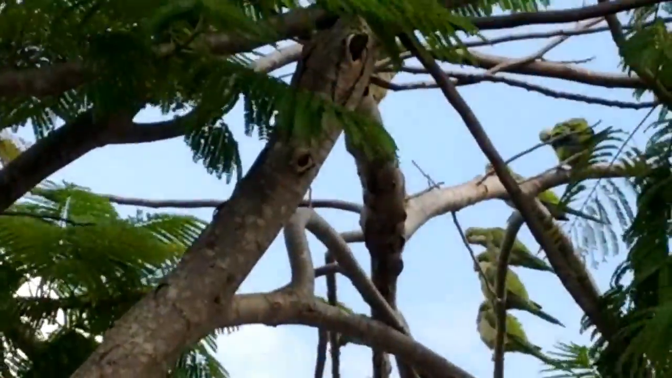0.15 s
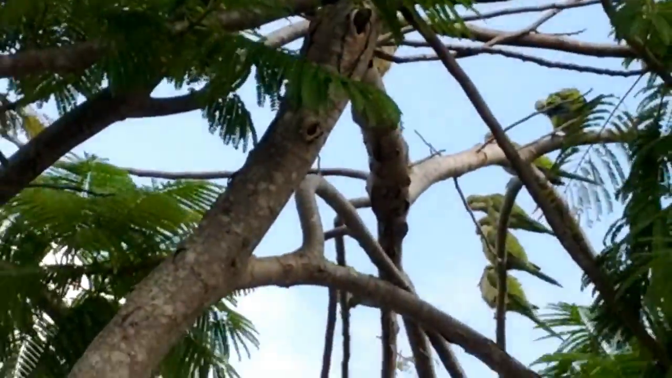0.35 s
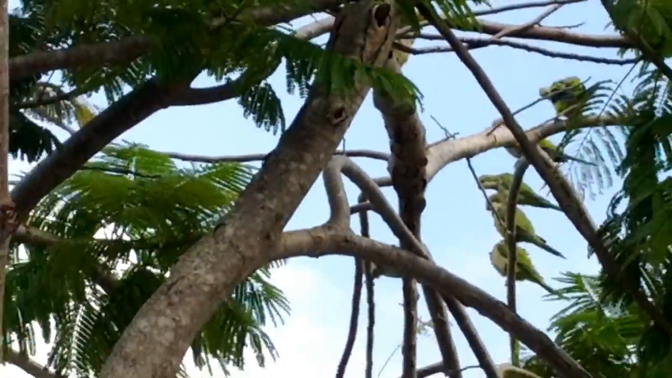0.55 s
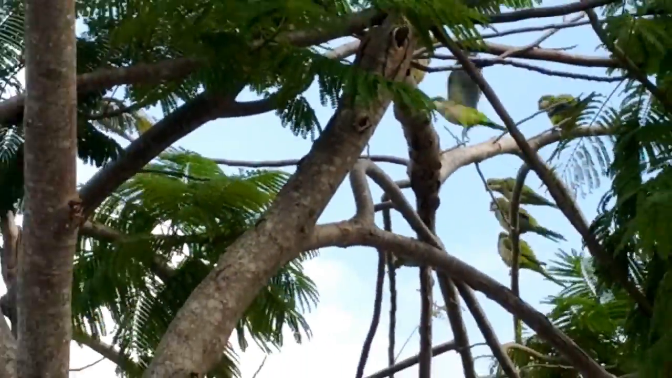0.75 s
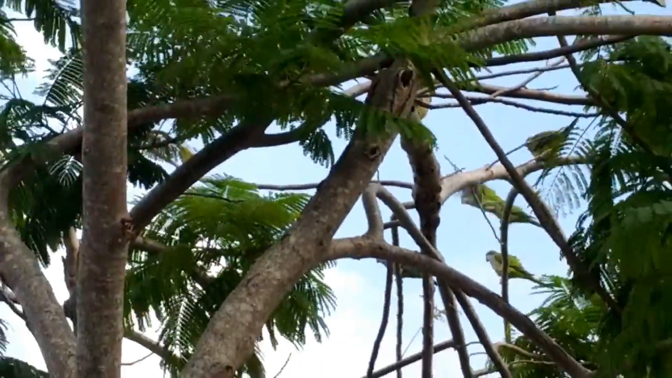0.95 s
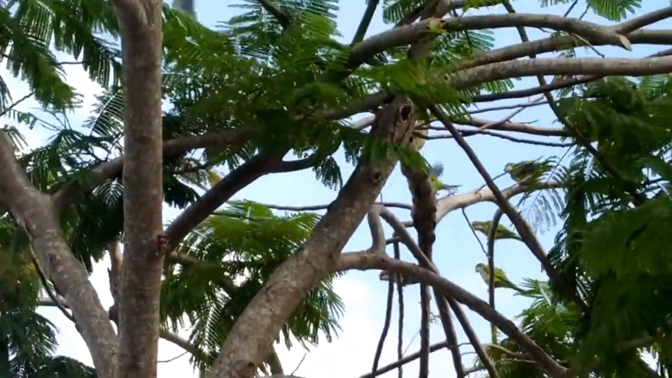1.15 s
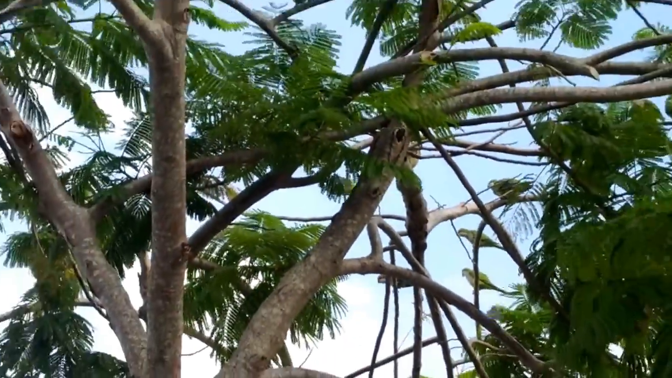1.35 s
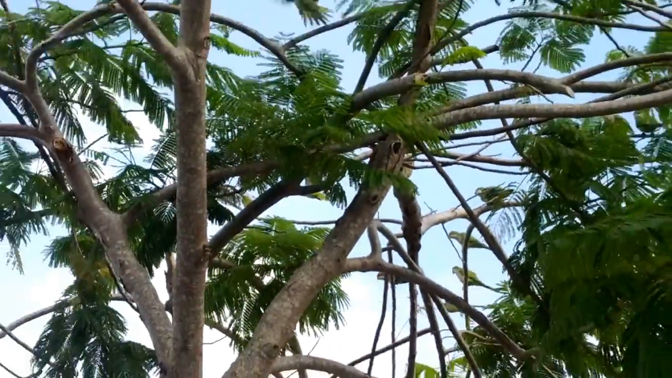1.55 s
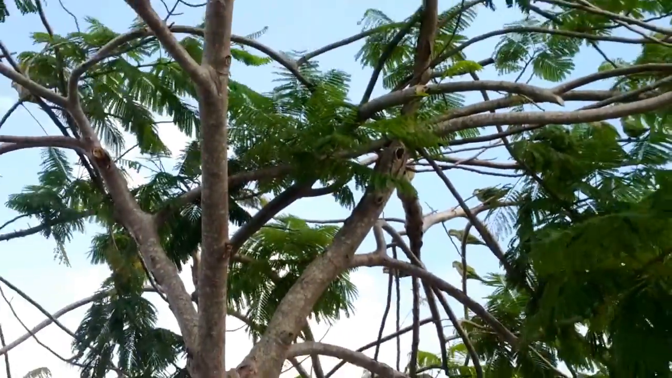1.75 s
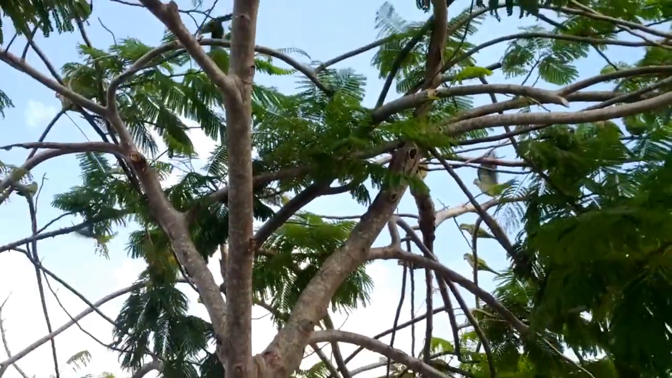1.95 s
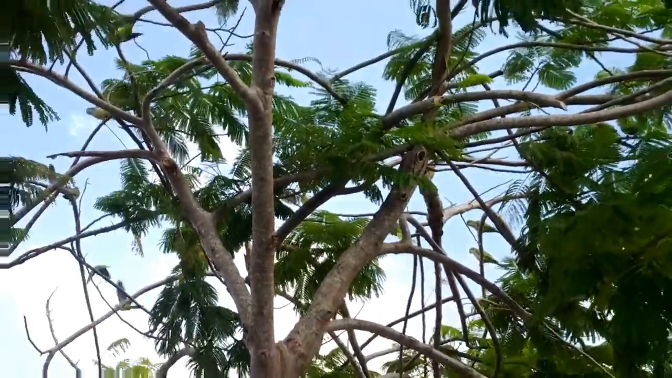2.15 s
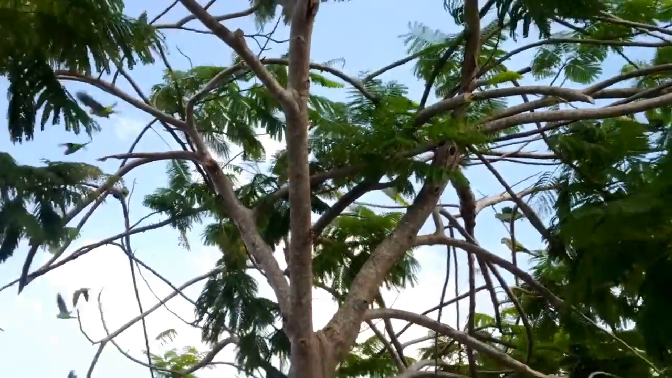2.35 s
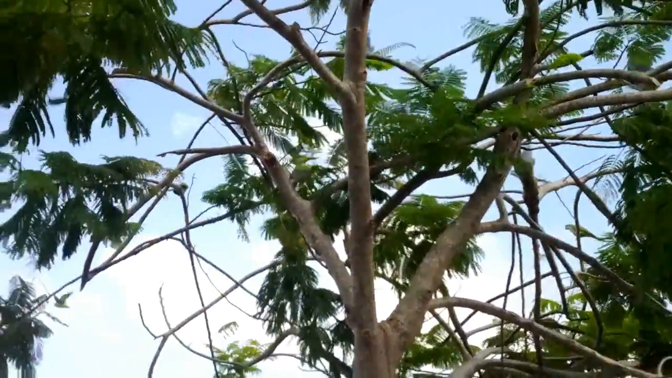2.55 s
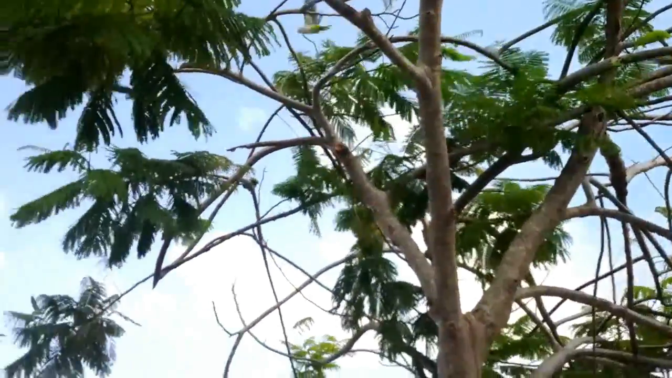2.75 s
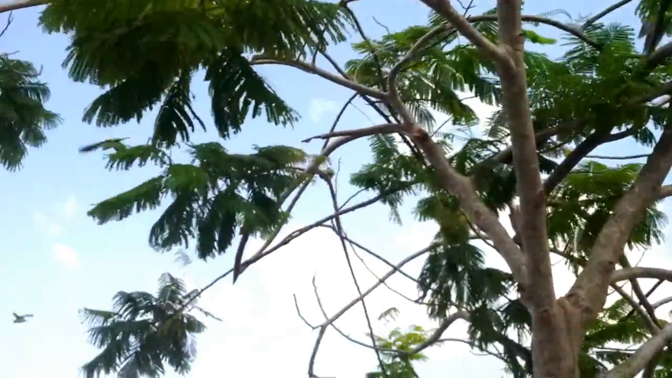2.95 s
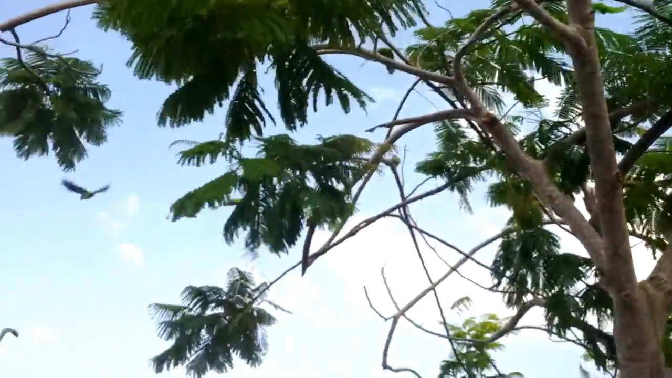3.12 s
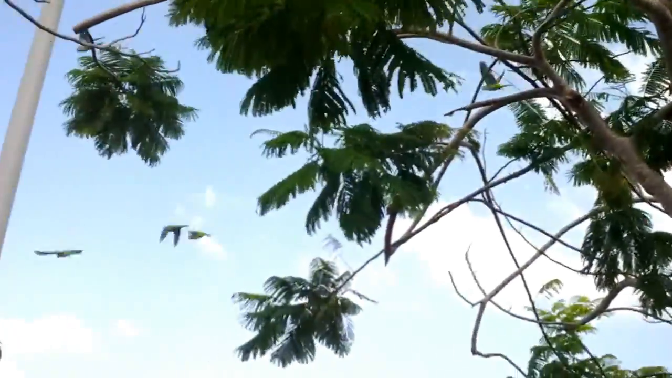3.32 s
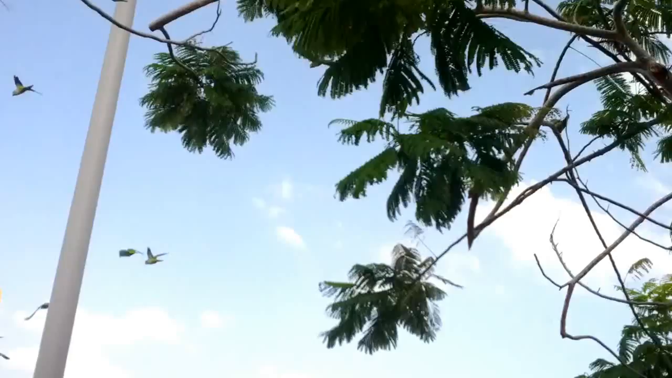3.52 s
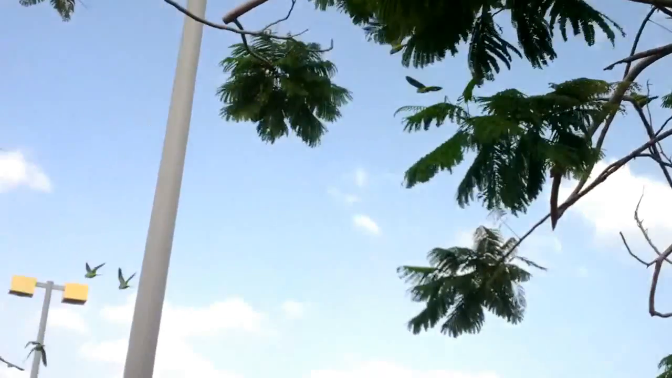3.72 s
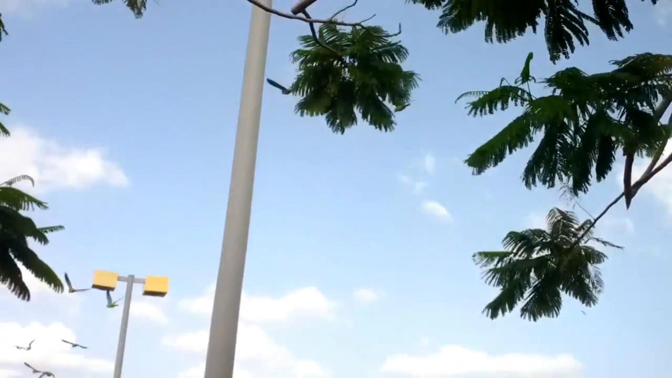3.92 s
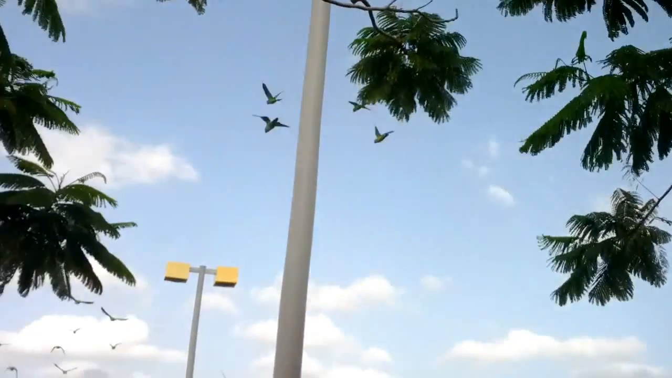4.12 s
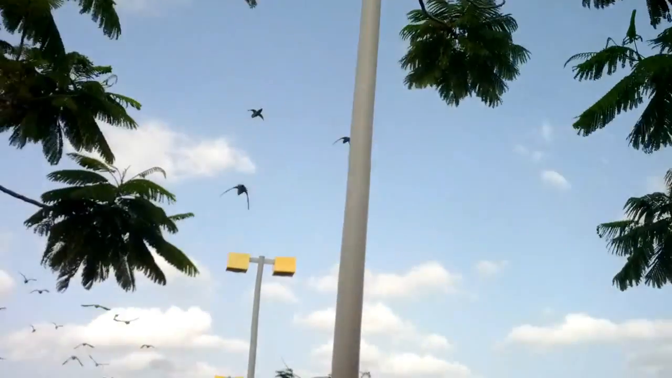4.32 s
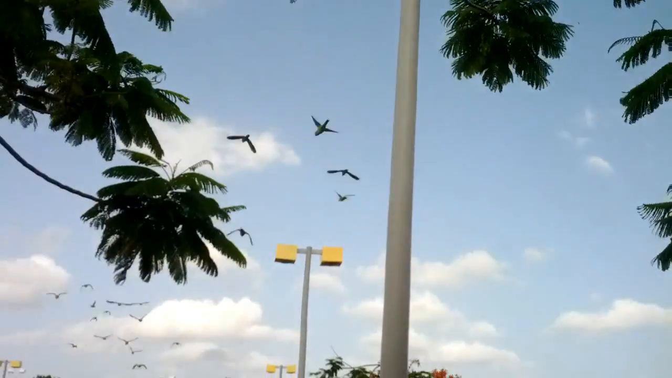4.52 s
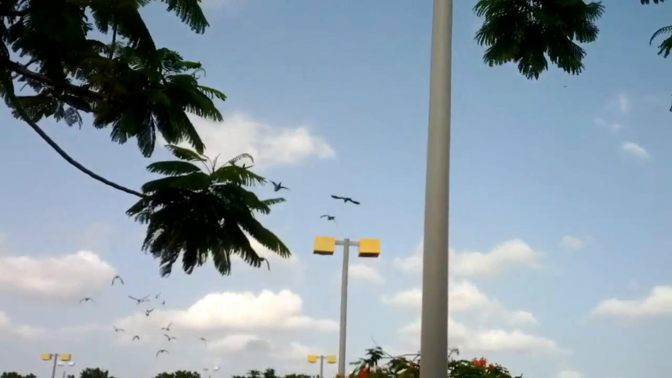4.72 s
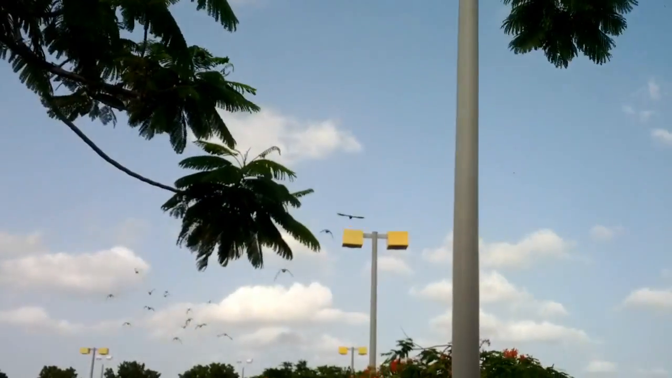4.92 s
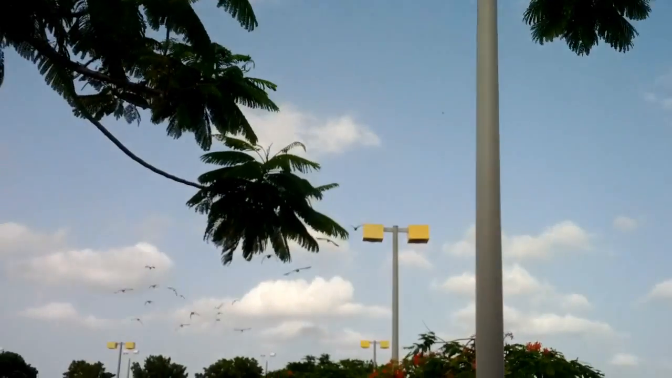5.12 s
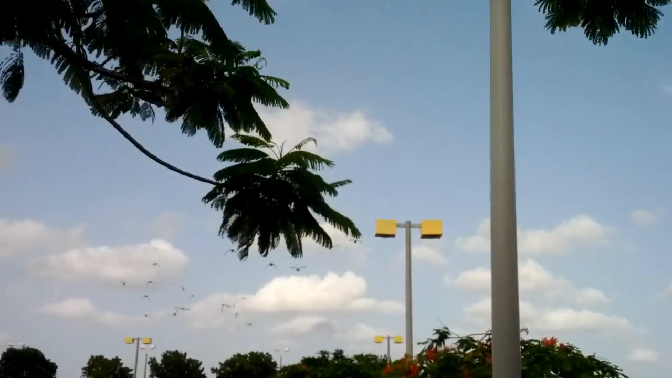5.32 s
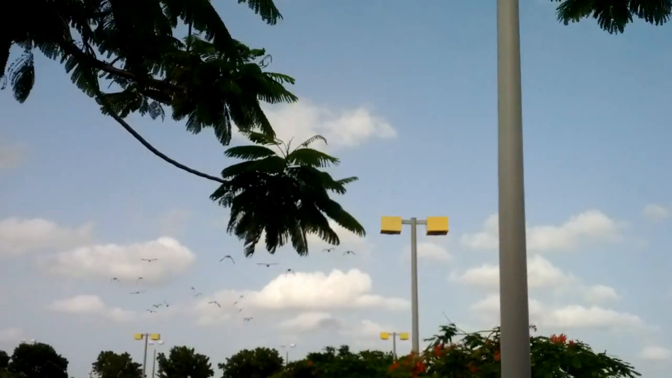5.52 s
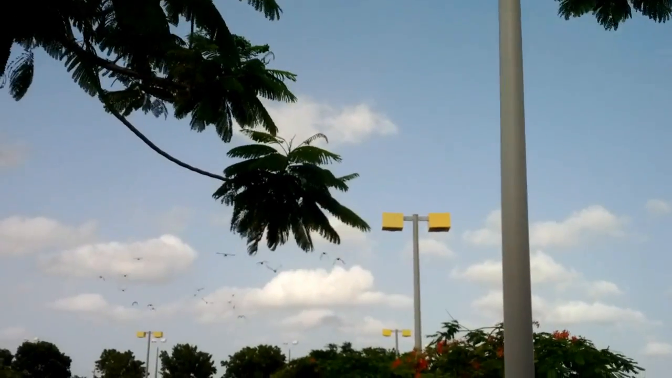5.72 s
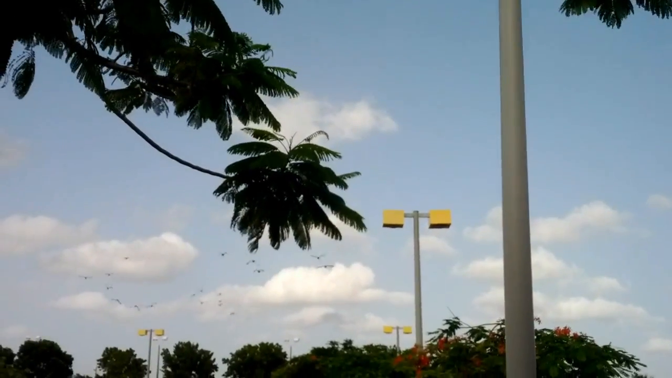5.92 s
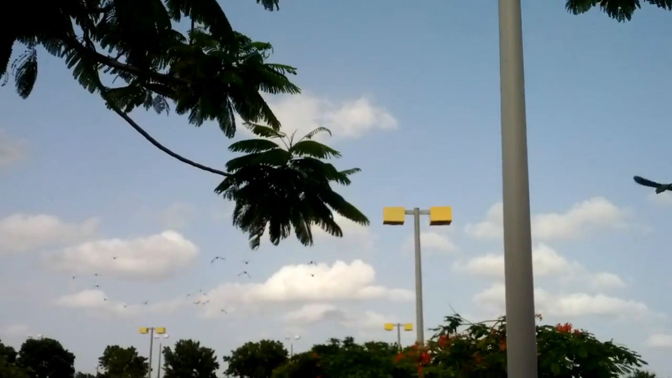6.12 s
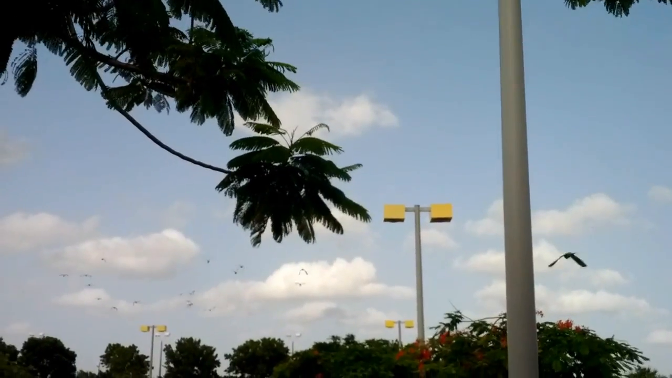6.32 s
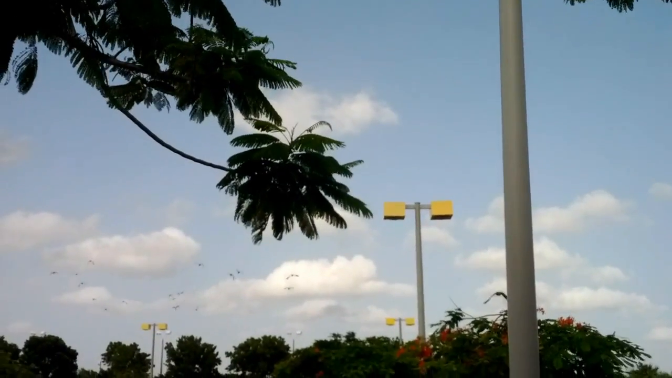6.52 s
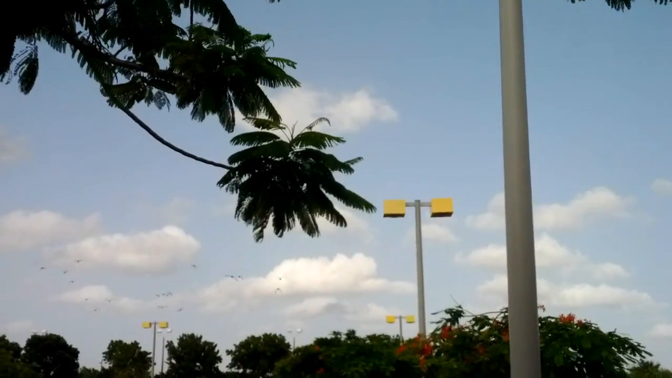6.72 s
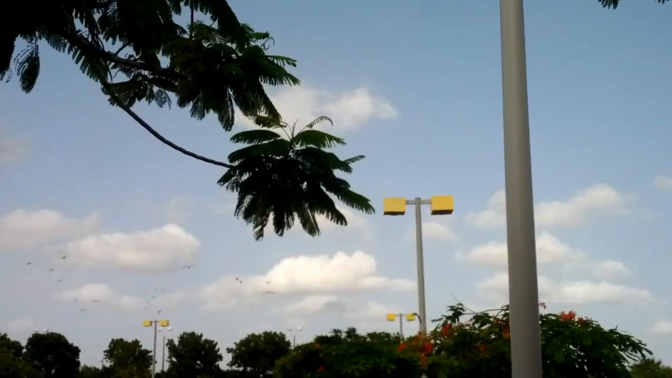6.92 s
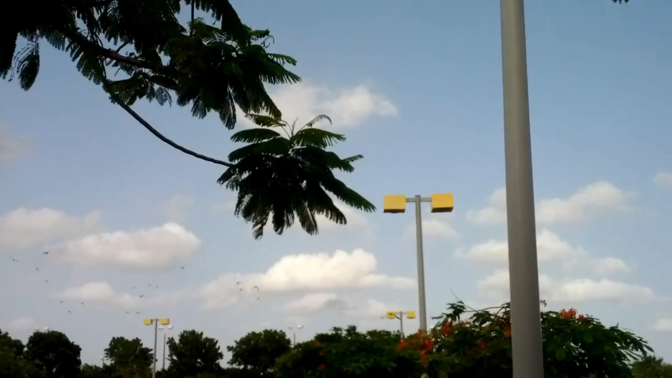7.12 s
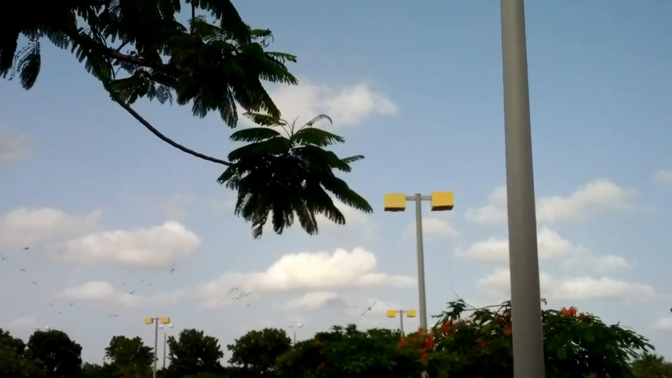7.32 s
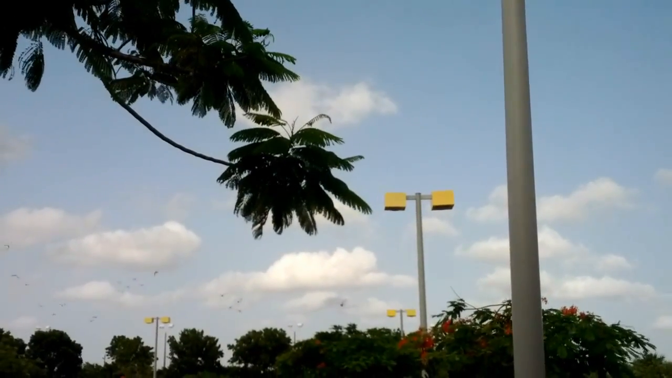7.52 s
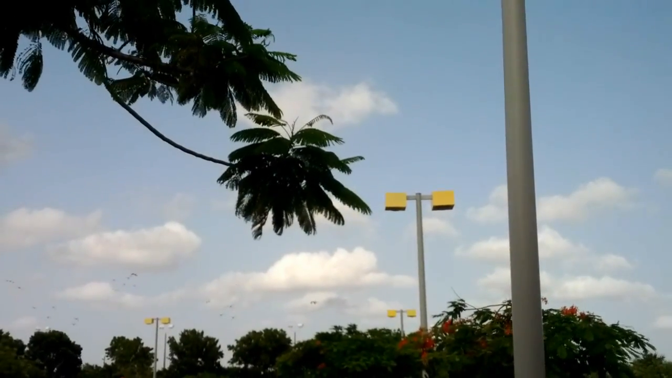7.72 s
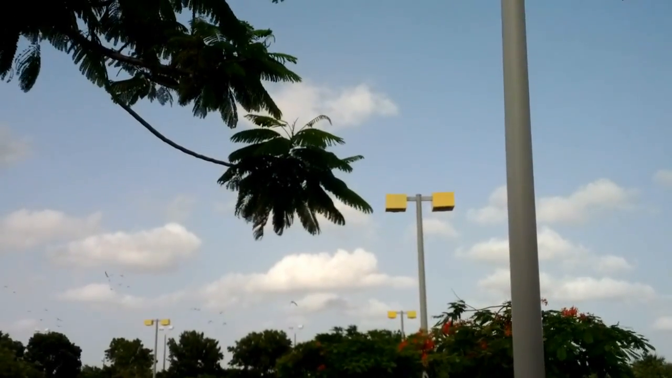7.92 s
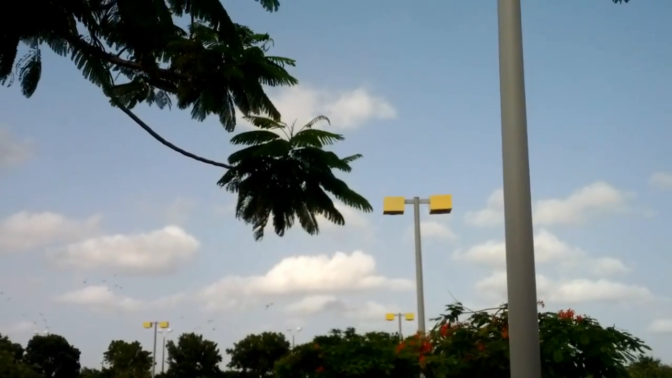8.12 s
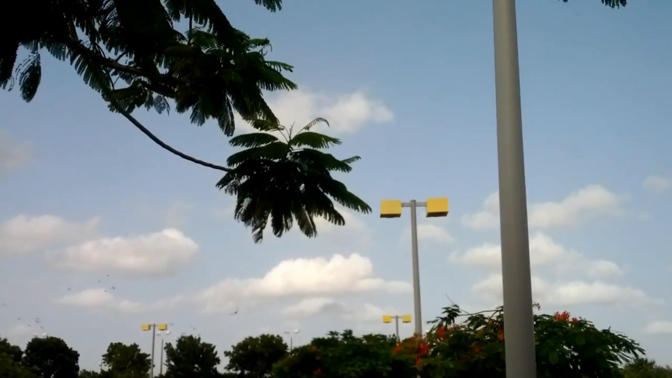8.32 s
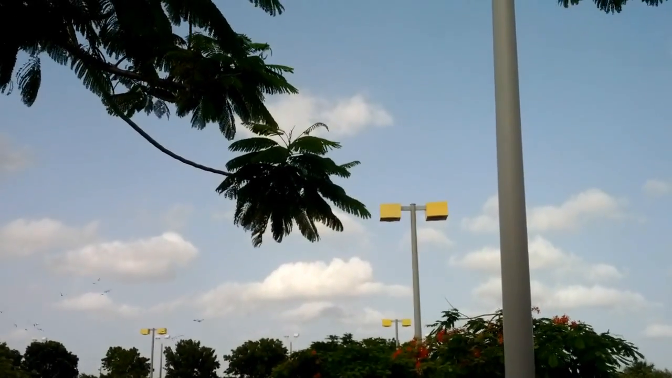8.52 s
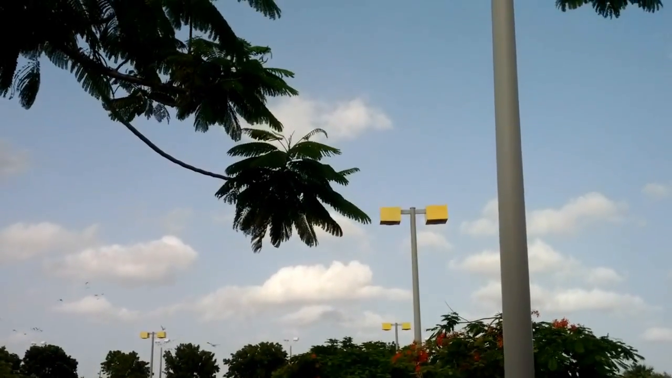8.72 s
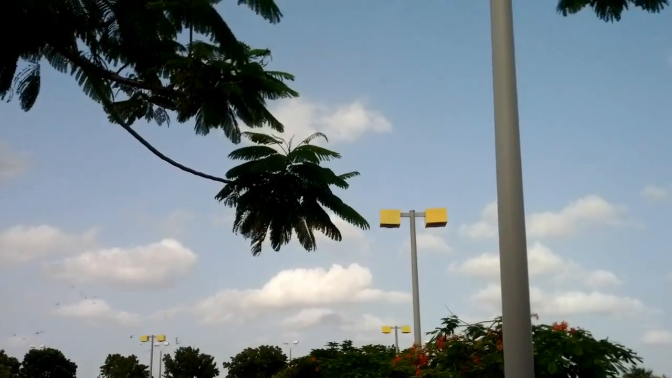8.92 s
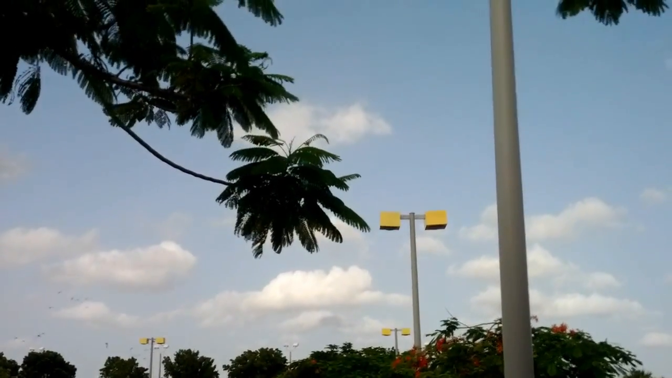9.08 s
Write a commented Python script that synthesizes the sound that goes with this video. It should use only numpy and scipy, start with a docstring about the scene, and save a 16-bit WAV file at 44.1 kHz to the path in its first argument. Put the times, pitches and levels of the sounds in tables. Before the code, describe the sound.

An open-air scene under trees beside a car park. For the first half second there is only low, distant traffic hum and soft puffs of wind on the microphone. A faint rattling call starts at 0.6 s, then a loud stuttering one at 1.0 s. From about 1.5 s harsh, buzzy, warbling parakeet screeches join, each roughly a fifth of a second, with a strong rattle at 2.3 s and the densest, loudest calling from 2 to 4 s over a screeching flock behind. Deep wind thumps strike around 2.7 and 3.0-3.2 s. After 4.5 s the cries weaken and recede, with a clearer screech at 5.9 s. Low engine rumble swells near 5.5 s; another wind thump lands at 7.1 s, with a faint vehicle drone and rumble at 7-7.7 s. Sparse distant calls continue, two soft, nearly level notes come around 8.6-8.8 s, and a last faint screech and rattle end it near 9 s.

```python
"""First come a low traffic hum and puffs of wind, then parakeets screech in a tree by a car park and fly off.
Near birds either rattle (a quick run of short, sagging syllables) or screech (a rising buzz that breaks
into warbled arches), with two soft notes late on; the rest of the flock screeches behind them.
Voices are sharp pulses and air shaped by throat and beak; trunks and ground scatter them, crowns add a tail.
Traffic is coloured noise and a wavering tone; gusts are low noise, with thumps from the strongest eddies."""
import sys
import numpy as np
from scipy import signal
from scipy.fft import rfft, irfft, next_fast_len
from scipy.io import wavfile

SR = 44100
rng = np.random.default_rng(int(sys.argv[2]) if len(sys.argv) > 2 else 0)


def unload_wav(signal):
    """Save mono or channel-first audio to the path in sys.argv[1] as 16-bit WAV at rate SR, clipped to [-1, 1]."""
    wavfile.write(
        sys.argv[1],
        SR,
        np.round(np.clip(np.atleast_2d(signal).T, -1, 1) * 32767).astype(np.int16),
    )


N = 403515
T = np.arange(N) / SR

# Rattling calls: start t/s, end t/s, base pitch f/Hz, level before the call's own rise and fall /dB,
# loudest point /share of the length, treble colour level/dB
RATTLE_CALLS = [(0.56, 0.795, 1048, -28.5, 0.88, 1), (.984, 1.183, 1128, -11.5, 0.52, -1),
                (1.272, 1.456, 1077, -19, 0.33, 3.5), (1.887, 2.09, 1156, -22, 0.13, 7.5),
                (2.297, 2.476, 1235, -8, 0.37, 1.5), (2.536, 2.701, 1150, -15.5, 0.48, 4),
                (3.487, 3.649, 1120, -16, 0.68, 3.5), (4.599, 4.742, 1083, -23.5, 0.55, 3.5),
                (4.703, 4.892, 1124, -15.5, 0.26, 3.5), (5.836, 5.909, 1150, -29.5, 0.98, 2),
                (6.092, 6.277, 1141, -18, 0.4, 7), (6.461, 6.632, 1050, -22, 0.49, -3),
                (7.158, 7.387, 1143, -25.5, 0.31, 2.5), (7.492, 7.616, 1110, -23, 0.55, -0.5),
                (8.972, 9.16, 1094, -31, 0.42, 0)]
# Screeching calls: start t/s, end t/s, crest pitch f/Hz, opening buzz t/s, first arches /per s,
# roughness /0-1, level before the call's own rise and fall /dB, treble colour level/dB
SCREECH_CALLS = [(1.567, 1.709, 2406, 0.054, 30, 0.46, -14.5, -1),
                 (1.767, 1.903, 2395, 0.07, 42, 0.52, -10.5, 4.5),
                 (2.052, 2.157, 2470, .01, 36, .44, -25, 4.5),
                 (2.132, 2.285, 2390, 0.027, 41, 0.4, -13.5, 0.5),
                 (2.651, 2.809, 2210, 0.013, 26.3, .33, -19.5, 0),
                 (2.774, 2.958, 2340, 0.053, 43, .58, -11.5, 0),
                 (2.95, 3.15, 2455, 0.062, 29, 0.71, -11.5, -0.5),
                 (3.206, 3.354, 2307, 0.061, 55, 0.45, -9, -2), (3.445, 3.533, 2405, 0.02, 82, 0, -21, -1),
                 (3.497, 3.687, 2220, 0.045, 26, 0.7, -14, -1),
                 (3.655, 3.865, 2686, 0.035, 35.6, 0.22, -8, 1),
                 (3.746, 3.919, 2256, 0.077, 45, 0.26, -11, -0.5),
                 (4.007, 4.219, 2308, 0.047, 32.7, 0.46, -17, 3),
                 (4.051, 4.187, 2256, 0.029, 57, 0.88, -18.5, -1),
                 (4.291, 4.508, 2103, 0.029, 69, .72, -19, -0.5),
                 (4.532, 4.743, 2240, 0.043, 59, 0.8, -25.5, -5),
                 (4.985, 5.166, 2293, .07, 28, 0.47, -16, .5),
                 (5.032, 5.266, 2107, 0.034, 44, 0.42, -23.5, -2.5),
                 (5.261, 5.396, 2130, 0.029, 74, 0.05, -27.5, 5.5),
                 (5.427, 5.541, 2190, 0.053, 45, .22, -34.5, -4),
                 (5.61, 5.759, 2200, 0.075, 43, 0.3, -27.5, -3),
                 (5.894, 6.032, 2347, .034, 54, 0.29, -11.5, -2),
                 (6.197, 6.417, 2202, 0.045, 47, 0.77, -24, 1),
                 (6.376, 6.535, 2480, 0.04, 39, 0.52, -16.5, 1),
                 (6.676, 6.89, 2320, 0.019, 35, 0.28, -28.5, -3),
                 (6.863, 7.056, 2190, 0.054, 32, 0.17, -30, -2),
                 (7.326, 7.55, 2387, 0.042, 49, 0.4, -27.5, 1.5),
                 (7.586, 7.83, 2082, 0.065, 67, 0.65, -19, 0),
                 (7.911, 8.136, 2305, 0.028, 38, 0.3, -29, -1),
                 (8.092, 8.282, 2335, 0.052, 43, 0.58, -28.5, -1),
                 (8.348, 8.568, 2093, 0.052, 72, 0.8, -25.5, 0),
                 (8.84, 8.988, 2395, 0.035, 35.7, 0.77, -27.5, -0.5)]
# Soft, nearly level notes: start t/s, end t/s, pitch f/Hz, level/dB, low colour level/dB
SOFT_NOTES = [(8.617, 8.683, 1681, -36, 11), (8.733, 8.794, 1990, -38, -1)]
# Colour given by the throat and open beak: f/Hz, level/dB
THROAT_COLOUR = [(600, -34), (1200, -21.5), (1650, -17.5), (1950, -13), (2200, -11), (3000, -1),
                 (3800, -2.5), (4500, 0), (5600, -8.5), (7000, -6.5), (8000, -7), (10500, -6.5),
                 (12000, -14.5), (13200, -24.5), (15500, -24.5)]
# How far off the callers are as they leave the tree: t/s, distance/m
CALLER_DISTANCE = [(0, 4.4), (3.7, 9.4), (4.5, 6.9), (6.0, 11.7), (9.15, 24)]
# Colour of the tyre roar, main part and top end: f/Hz, relative level per Hz /dB
ROAR_COLOUR = [(15, -30), (25, 3), (55, 2.5), (102, -6), (173, -6.5), (224, -8), (267, -12.5), (323, -19),
               (371, -14), (516, -22.5), (798, -12), (1440, -22), (1600, -23), (2080, -27), (3520, -120)]
ROAR_TOP_COLOUR = [(2200, -25), (4000, -56), (11000, -41.5), (13000, -63)]
# Slow rise and fall of the tyre roar, as its level from 550 to 1050 Hz: t/s, level/dB
ROAR_LEVEL = [(0.2, -45.5), (7.66, -43.5), (9.1, -44)]
# Vehicles that swell and fade: peak t/s, time from peak to 1/e of its gain t/s,
# rumble level/dB, drone level/dB
PASSING_ENGINES = [(5.55, .25, -37.5, -59), (7.097, 0.32, -56, -48.5), (7.647, 0.3, -39, -44.5),
                   (8.7, 0.33, -44, -54)]
# Colour of engine rumble: f/Hz, relative level/dB
RUMBLE_COLOUR = [(60, -24.0), (130, -17.5), (170, 0.5), (230, -8.5), (400, -13.5),
                 (700, -25.5), (2000, -88), (7000, -94)]
# Gusts on the microphone: peak t/s, time from peak to 1/e of its gain t/s, level/dB
WIND_GUSTS = [(0.033, 0.046, -28), (0.215, 0.054, -26.5), (0.53, 0.28, -30), (1.176, 0.13, -29.5),
              (1.62, 0.25, -26.5), (2.31, 0.17, -28), (2.646, 0.14, -18.5), (3.07, 0.15, -25.5),
              (5.5, 0.21, -35), (5.812, 0.052, -26), (7.118, 0.15, -21.5)]
# Strongest eddies, which thump the microphone: t/s, pitch f/Hz, level of the push /dB
WIND_THUMPS = [(2.658, 107, -9), (2.714, 132, -5.5), (2.958, 156, -10.5), (2.982, 129, -5.5),
               (2.996, 145, -5.5), (3.1, 54, -3), (3.104, 188, -10.5), (3.161, 55, -6), (3.164, 168, -16),
               (7.107, 51.5, -17), (7.132, 65, -4)]
# Colour of churning wind: f/Hz, relative level/dB
CHURN_COLOUR = [(15, -24), (40, 6.0), (110, 3), (200, -6), (400, -25.0), (800, -38), (2000, -37), (7000, -105)]

TOP_HZ = 15650  # upper limit of the sound
# On the perch: distance, level of a full cry, and scattered against direct sound
PERCH_M, FULL_CRY_DB, SCATTER_DB = 6.58, -4.5, -11
SCATTER_PER_DB = 0.63  # dB of scattered share gained per dB lost to distance
AIR_DB_PER_M = 0.56  # top of a call lost to the air per metre beyond the perch
# A full cry is thin in the lows; they fill in as a bird holds back (dB, dB per dB held back)
RATTLE_LOW_DB, RATTLE_LOW_SLOPE = -9.5, 0.89
SCREECH_LOW_DB, SCREECH_LOW_SLOPE = -5, 0.58
SYLLABLES_PER_S = 42.8  # average pace, shared by all rattles
FIRST_SYLLABLE_DB = -3.5  # a run starts with one timid syllable
# The rest of the flock takes alarm, is loudest soon after and fades as it leaves
ALARM_S, UPROAR_S, FLOCK_DB, FLOCK_FADE_DB_PER_S = 0.96, 2.4, -30.5, 2.5
DISTANT_ENGINES_DB = -58.5  # rumble and drone always present further off


def near_birds():
    """Callers in and around the tree rattle, screech or give soft notes, each at its own time."""
    calls = []
    for start, end, hz, db, crest, treble_db in RATTLE_CALLS:
        low_db = low_colour(start, db, RATTLE_LOW_DB, RATTLE_LOW_SLOPE)
        calls.append((start, db, rattle(end - start, hz, crest, low_db, treble_db)))
    for start, end, hz, buzz_s, rate, rough, db, treble_db in SCREECH_CALLS:
        low_db = low_colour(start, db, SCREECH_LOW_DB, SCREECH_LOW_SLOPE)
        call = screech(end - start, hz, buzz_s, rate, rough, low_db, treble_db)
        calls.append((start, db, call))
    for start, end, hz, db, low_db in SOFT_NOTES:
        calls.append((start, db, note(end - start, hz, low_db)))
    out = np.zeros(N)
    for start, db, call in calls:
        add(out, start, gain(db) * travel(call, start))
    return out


def rattle(length, hz, crest, low_db, treble_db, duty=0.79, sag=0.35, arch=0.15, fade_db=-2):
    """Short syllables, each dipping in pitch and rough at its edges; the run rises and falls as a whole."""
    t = np.arange(int(length * SR)) / SR
    syllable = t * SYLLABLES_PER_S + 0.0313 * wander(t, 31.0)
    place = (2 * (syllable % 1) - 1) / duty  # -1 to 1 across the sounding part
    gate = np.clip((1.1 - np.abs(place)) / 0.37, 0, 1)
    first_db = FIRST_SYLLABLE_DB * (syllable < 1)
    gate *= gain(fade_db * place + first_db + wander(t, SYLLABLES_PER_S))
    edge = np.minimum(np.abs(place), 1) ** 1.8
    sagging = sag * edge * (1 + 0.5 * wander(t, SYLLABLES_PER_S))
    run_arch = arch * (np.sin(np.pi * t / length) - 0.8)
    pitch = hz * (1 + sagging + run_arch + 0.02 * wander(t, SYLLABLES_PER_S))
    halves = np.clip(0.9 + 0.58 * wander(t, SYLLABLES_PER_S), 0, 1)
    # doubled, because the half lines sound at the written pitch
    source = gate * syrinx(t, 2 * pitch, halves, rough=0.192 + 0.588 * edge)
    voice = beak(source, low_db, treble_db)
    return voice * effort(t, crest, rise_db=18, fall_db=7, attack=0.0091, release=0.024)


def screech(length, hz, buzz_s, rate, rough, low_db, treble_db,
            dip=0.44, trough_db=-2, droop=0.14, droop_s=0.03):
    """A rising buzz breaks into slowing arches, clear on crests, ragged in troughs; the end droops."""
    t = np.arange(int(length * SR)) / SR
    broken = np.clip((t / max(buzz_s, 0.005) - 1) * 8 + 0.5, 0, 1)  # 0 in the buzz, 1 in the arches
    since = t - buzz_s
    arches = rate * since / (1 + np.abs(since)) - 0.3 + 0.0329 * wander(t, 40)
    trough = 1 - np.abs(np.cos(np.pi * arches))  # 0 on a crest, 1 in a trough
    buzz = (1.25 - 0.68 * np.exp(-t / 0.04)) * (1 + 0.05 * wander(t, 69.8))
    pitch = hz * ((1 - broken) * buzz + broken * (1 - dip * trough))
    pitch *= 1 + 0.02057 * wander(t, 130)
    pitch *= 1 - droop * np.exp((t - length) / droop_s)
    arch_halves = np.clip(0.05 + 0.3 * trough + 0.17 * wander(t, 60), 0, 1)
    halves = 0.7 * (1 - broken) + broken * arch_halves
    harsh = np.clip(rough, 0, 1) * (0.4 + 0.25 * (1 - broken) + 1.1 * trough * broken)
    harsh *= gain(3 * wander(t, 50))
    push = gain(trough_db * trough * broken + 0.43 * wander(t, 75.0))
    voice = beak(push * syrinx(t, pitch, halves, harsh), low_db, treble_db)
    return voice * effort(t, crest=0.45, rise_db=8.5, fall_db=6, attack=0.018)


def note(length, hz, low_db, treble_db=-5):
    """A quiet contact call: a nearly steady pitch with little roughness."""
    t = np.arange(int(length * SR)) / SR
    clear = syrinx(t, hz * (1 + 0.015 * wander(t, 40)), halves=0.1, rough=0.15)
    voice = beak(clear, low_db, treble_db)
    return voice * effort(t, crest=0.5, rise_db=0, fall_db=3)


def syrinx(t, hz, halves, rough, jitter=0.1195, jitter_hz=1500, shimmer=0.29, count=17):
    """The voice organ's pulses: strong-weak turns add half lines, uneven cycles and gated air add harshness."""
    phase = np.pi * np.cumsum(hz * (1 + jitter * rough * wander(t, jitter_hz))) / SR  # at half the pitch
    pulses = np.zeros(len(t))
    for k in range(1, count):
        strength = gain(3.5 * wander(t, 55))
        line = strength * np.cos(k * phase) * (k * hz / 2 < TOP_HZ)
        pulses += line * (halves if k % 2 else 1)  # odd k lies between the full harmonics
    air = 0.5 * rng.standard_normal(len(t)) * (1 + np.cos(2 * phase))
    return unit(pulses) * (1 + shimmer * rough * wander(t, 700)) + rough * air


def beak(source, low_db, treble_db):
    """The throat shapes the voice, the beak opening tips its colour, paths through branches ripple it."""
    hz = np.arange(1000, 16000, 380)
    ripple = np.c_[hz, 2.3 * rng.standard_normal(len(hz))]
    tilt = [(1100, -1), (2100, 0.95 * low_db), (3000, 0.83 * low_db),
            (4600, 1), (5200, 1.5), (7500, treble_db)]
    voice = colour(source, THROAT_COLOUR)
    voice = colour(voice, tilt)
    return unit(colour(voice, ripple))


def effort(t, crest, rise_db, fall_db, attack=0.0084, release=0.02):
    """Breath effort: a quick start, a rounded swell to the crest (share of length), a fade, a quick stop."""
    place, crest = t / t[-1], np.clip(crest, 0.05, 0.95)
    rise = -rise_db * np.maximum(1 - place / crest, 0) ** 2
    fall = -fall_db * np.maximum(place - crest, 0) / (1 - crest)
    return gain(rise + fall) * np.minimum(t / attack, 1) * np.minimum((t[-1] - t) / release, 1)


def low_colour(when, level_db, full_cry_low_db, slope):
    """The more softly a bird calls, the more its lower tones stand out (dB)."""
    held_back_db = max(FULL_CRY_DB - level_db - distance_loss(when), 0)
    return full_cry_low_db + slope * held_back_db


def caller_metres(when):
    """Distance of a caller at this time, read along straight lines."""
    return np.interp(when, *np.transpose(CALLER_DISTANCE))


def distance_loss(when):
    """Decibels lost by a caller at this time, against one on the perch."""
    return 20 * np.log10(caller_metres(when) / PERCH_M)


def travel(call, when):
    """With distance the air dulls the top of a call, and more of the sound arrives scattered."""
    top_db = -AIR_DB_PER_M * (caller_metres(when) - PERCH_M)
    dulled = colour(call, [(9000, 0), (13000, top_db)])
    return scattered(dulled, SCATTER_DB + SCATTER_PER_DB * distance_loss(when))


def scattered(call, share_db, t60=0.13):
    """Trunks and ground throw a call back at once, by different random paths for each call."""
    t = np.arange(SR // 6) / SR
    paths = rng.standard_normal(len(t)) * (rng.random(len(t)) < 0.03) * (t > 0.003)
    paths *= gain(-60 * t / t60)
    paths *= gain(share_db) / np.linalg.norm(paths)
    paths[0] = 1  # the direct sound
    return signal.fftconvolve(call, paths / np.linalg.norm(paths))


def far_birds(count=56, rough=0.29, low_db=4, treble_db=-1, scatter_db=-4, calm_db=-65):
    """Overlapping screeches of the rest of the flock, with a large share of scattered sound."""
    out = np.zeros(N)
    for k, (when, size, pitch, speed) in enumerate(rng.random((count, 4))):
        length, hz, rate = 0.2016 + 0.1 * size, 2050 + 350 * pitch, 30 + 20 * speed
        call = screech(length, hz, 0.055, rate, rough, low_db, treble_db)
        start = (k + when / 2) / count * N / SR - 0.1
        add(out, start, scattered(call, scatter_db))
    alarm = np.clip((T - ALARM_S) / (UPROAR_S - ALARM_S), 0, 1)
    leaving_db = -FLOCK_FADE_DB_PER_S * np.maximum(T - UPROAR_S, 0)
    return unit(out) * (gain(calm_db) + alarm * gain(FLOCK_DB + leaving_db))


def trees(x, tail_db=-21, t60=0.53, ring_hz=4430, ring_db=7):
    """The tree crowns leave a faint, fading tail that rings most at one pitch."""
    t = np.arange(SR) / SR
    tail = rng.standard_normal(SR) * gain(-60 * t / t60) * np.minimum(t / 0.03, 1)
    ring = [(ring_hz - 200, 0), (ring_hz, ring_db), (ring_hz + 200, 0), (10000, 0), (14000, -6)]
    tail = unit(colour(tail, ring))
    return x + gain(tail_db) * signal.fftconvolve(x, tail)[:N] / np.sqrt(SR)


def traffic(drone_hz=380):
    """Far roads: slowly swelling tyre roar from noise, engine rumble from low noise, drone from one tone."""
    roar = colour(rng.standard_normal(N), list(ROAR_COLOUR) + list(ROAR_TOP_COLOUR))
    tyre_band = signal.butter(4, [550, 1050], "band", fs=SR, output="sos")
    tyres = signal.sosfilt(tyre_band, roar)  # only used to set the level of the roar
    roar = roar / tyres.std() * gain(curve(ROAR_LEVEL) + 0.66 * wander(T, 4.1))
    rumble = unit(colour(rng.standard_normal(N), RUMBLE_COLOUR))
    pitch = drone_hz * (1 + 0.0156 * wander(T, 2.4) + 0.015 * wander(T, 40))
    drone = np.sin(2 * np.pi * np.cumsum(pitch) / SR) * gain(2 * wander(T, 7.2))
    passing = np.zeros(N)
    for s, half, rumble_db, drone_db in PASSING_ENGINES:
        passing += rumble * swell(s, half, rumble_db) + drone * swell(s, half, drone_db)
    return roar + passing + gain(DISTANT_ENGINES_DB) * (rumble + drone)


def wind(suction=0.5):
    """Gusts churn at the microphone; each strong eddy is a push followed by a longer suck."""
    churn = unit(colour(rng.standard_normal(N), CHURN_COLOUR))
    out = churn * sum(swell(s, half, db) for s, half, db in WIND_GUSTS)
    t = np.arange(-SR // 20, SR // 20) / SR
    for s, hz, db in WIND_THUMPS:
        cycles = t * hz
        push = np.exp(-(cycles / 0.12) ** 2)
        suck = suction * np.exp(-((cycles - 0.45) / 0.28) ** 2)
        add(out, s + t[0], gain(db) * (push - suck))
    return out


def swell(s, half, db):
    """Gain that rises to a peak at time s and falls again."""
    return gain(db) * np.exp(-((T - s) / half) ** 2)


def gain(db):
    """Turn decibels into a plain multiplier."""
    return 10 ** (np.asarray(db) / 20)


def unit(x):
    """Scale to an average strength (rms) of 1."""
    return x / np.sqrt(np.mean(x ** 2) + 1e-18)


def curve(rows):
    """Join (t/s, value) rows by straight lines."""
    return np.interp(T, *np.transpose(rows))


def add(out, start, x):
    """Mix x into out from a start time in seconds."""
    i = max(int(start * SR), 0)
    out[i:i + len(x)] += x[:max(N - i, 0)]


def wander(t, rate):
    """Smooth random drift with a new target rate times a second and a spread near 1."""
    seed = rng.integers(2 ** 31)
    steps = np.random.default_rng(seed).standard_normal(int(t[-1] * rate) + 3)
    k, part = np.divmod(t * rate, 1)
    k, ease = k.astype(int), (1 - np.cos(np.pi * part)) / 2
    return steps[k] * (1 - ease) + steps[k + 1] * ease


def colour(x, points):
    """Filter through (f/Hz, level/dB) points, reacting only after the sound arrives."""
    size = next_fast_len(len(x) + 2048, True)
    size += size % 2
    hz, db = np.transpose(points)
    f = np.maximum(np.arange(size // 2 + 1) * SR / size, 1)
    level_db = np.interp(np.log(f), np.log(hz), db)
    # folding the cepstrum (spectrum of the log levels) forward removes any pre-echo
    cepstrum = irfft(np.log(gain(level_db)))
    cepstrum[1:size // 2] *= 2
    cepstrum[size // 2 + 1:] = 0
    return irfft(rfft(x, size) * np.exp(rfft(cepstrum)))[:len(x)]


def scene():
    """Birds sound among the trees; traffic and wind reach the microphone without the trees' tail."""
    birds = trees(near_birds() + far_birds())
    return (birds + traffic() + wind())[None]


def record(dry, ceiling=0.92):
    """The microphone rounds the highest peaks and cuts the top."""
    rounded = dry / (1 + (dry / ceiling) ** 4) ** (1 / 4)
    top_cut = signal.ellip(10, 0.2, 70, TOP_HZ, fs=SR, output="sos")
    return signal.sosfilt(top_cut, rounded)


dry = scene()
out = record(dry)
unload_wav(out)
```